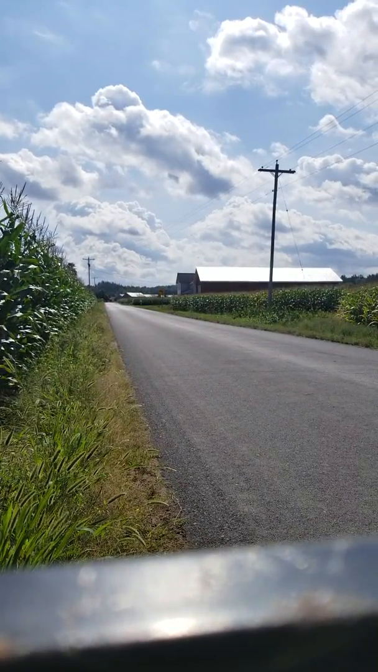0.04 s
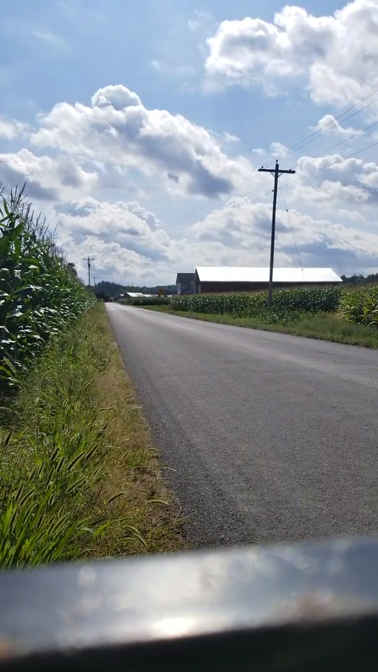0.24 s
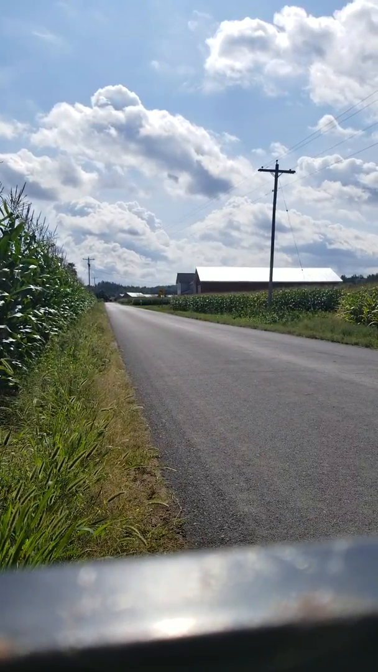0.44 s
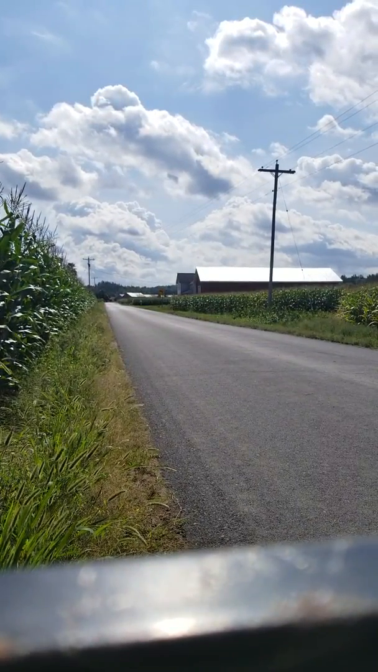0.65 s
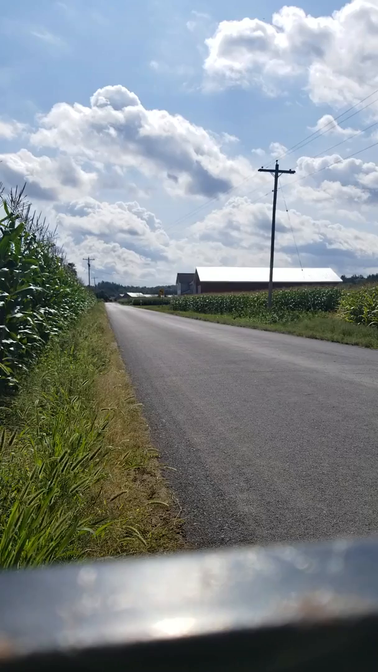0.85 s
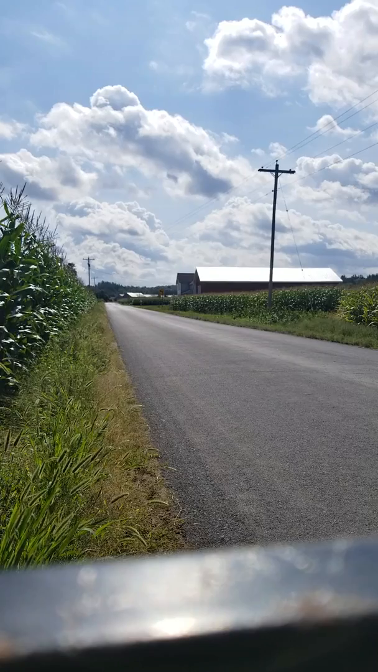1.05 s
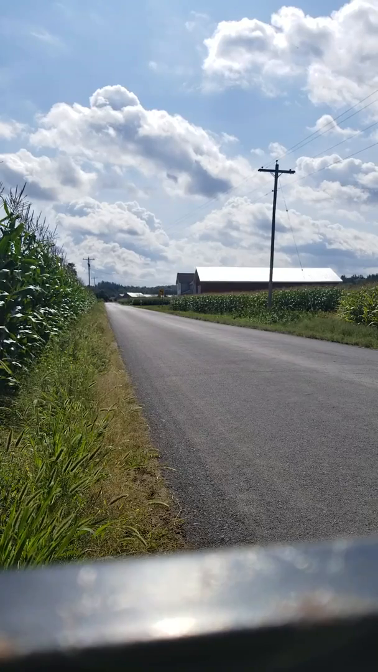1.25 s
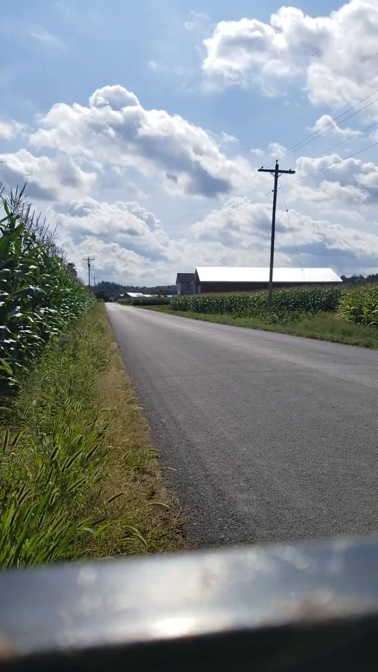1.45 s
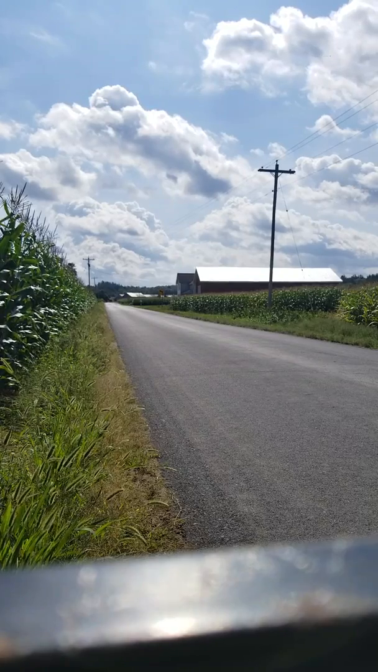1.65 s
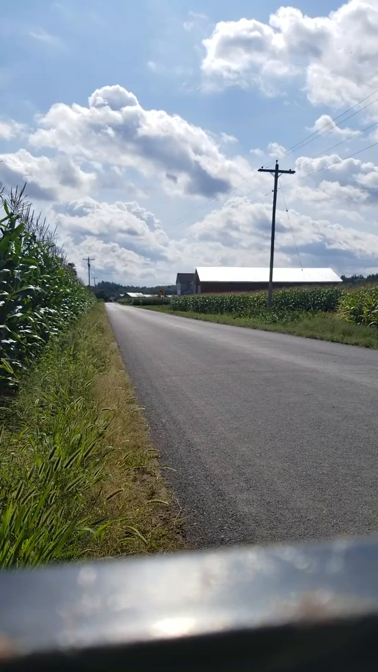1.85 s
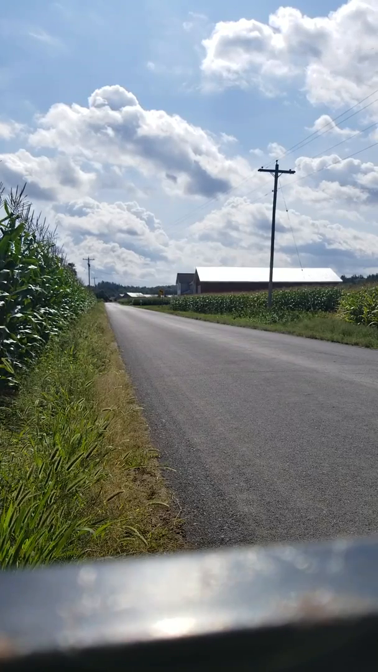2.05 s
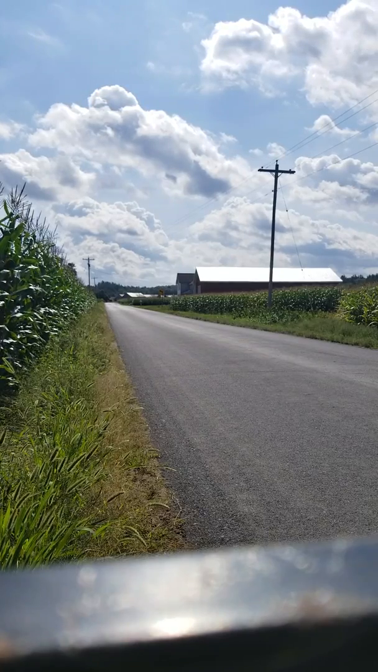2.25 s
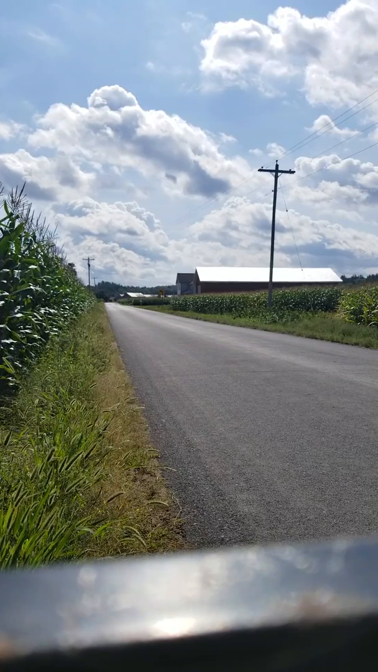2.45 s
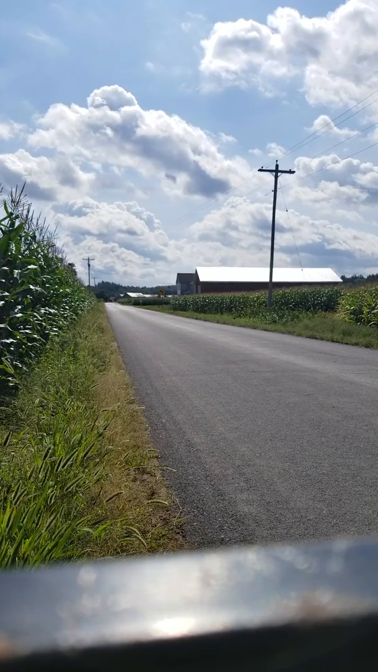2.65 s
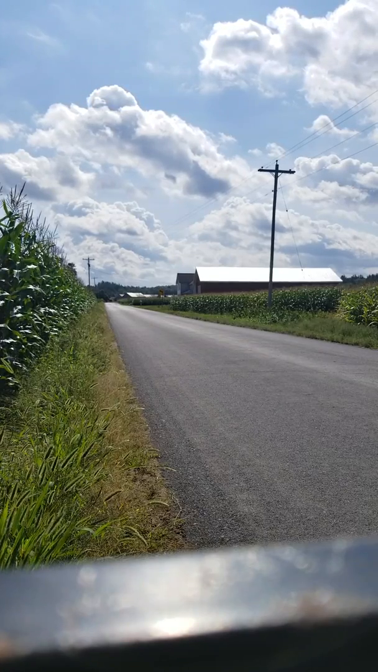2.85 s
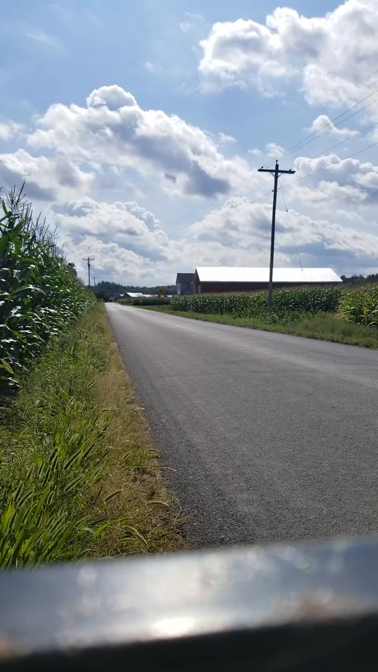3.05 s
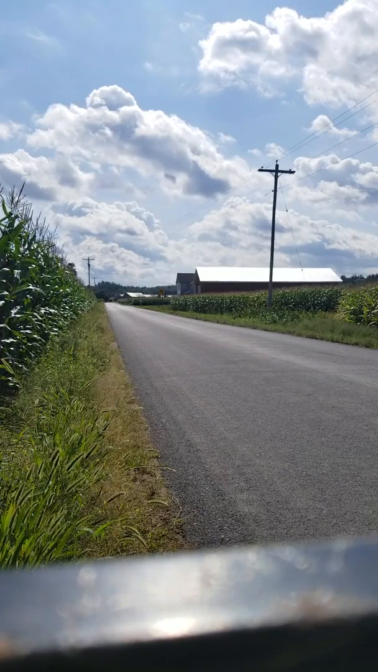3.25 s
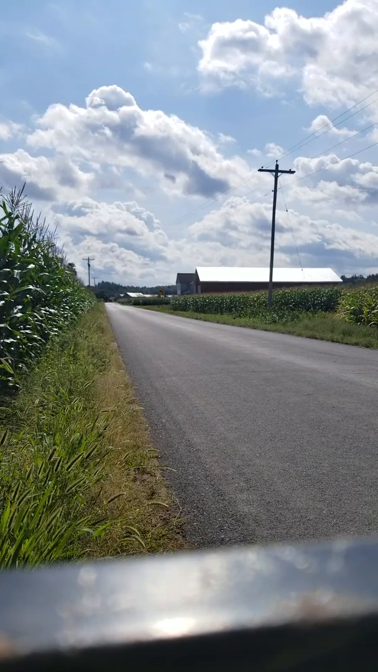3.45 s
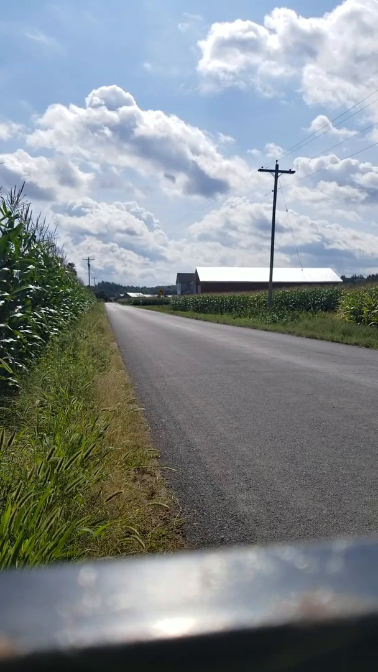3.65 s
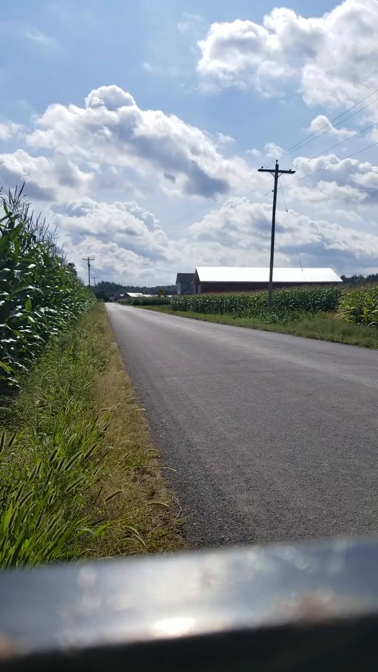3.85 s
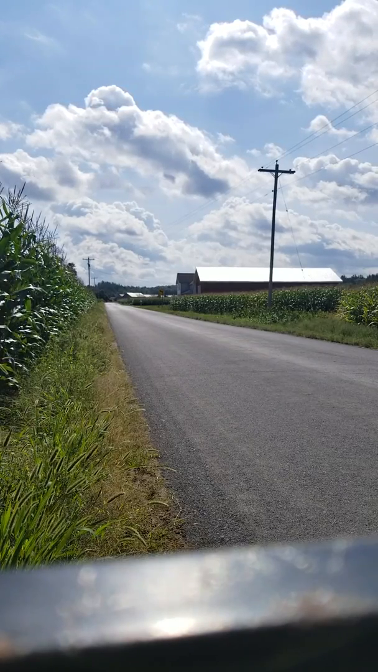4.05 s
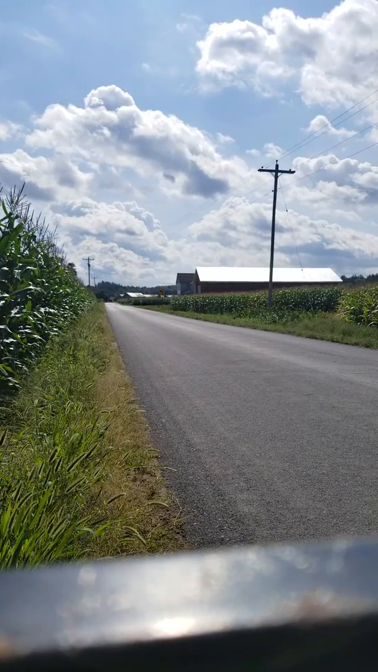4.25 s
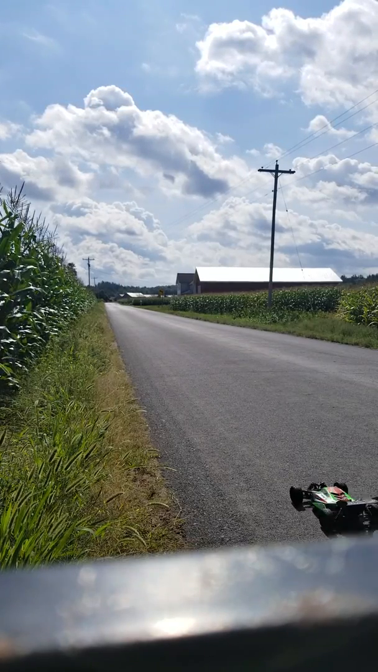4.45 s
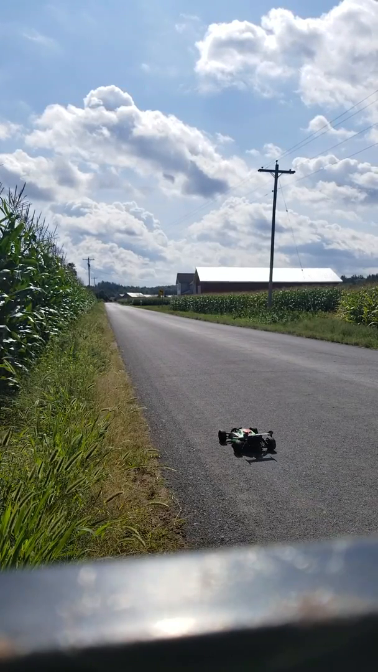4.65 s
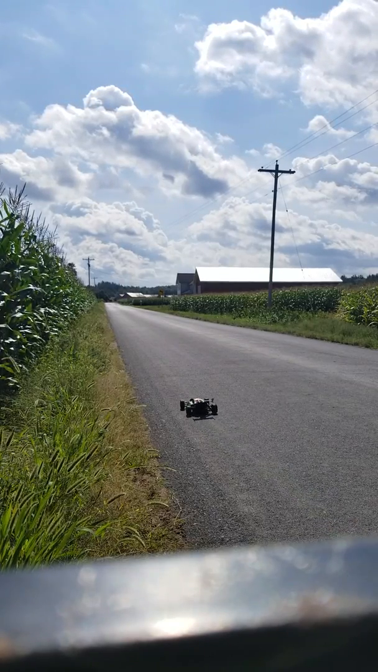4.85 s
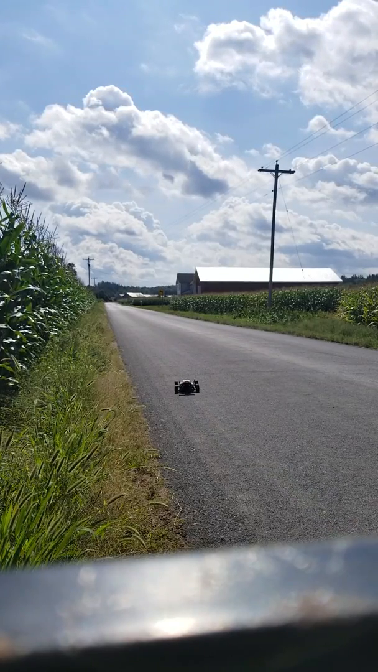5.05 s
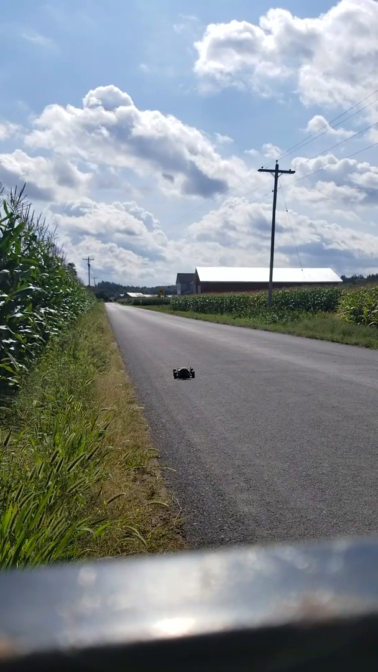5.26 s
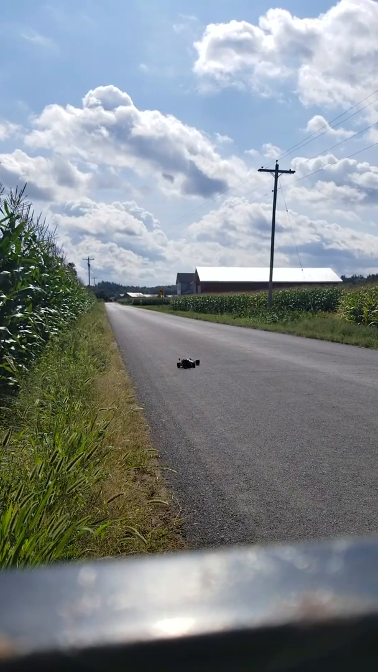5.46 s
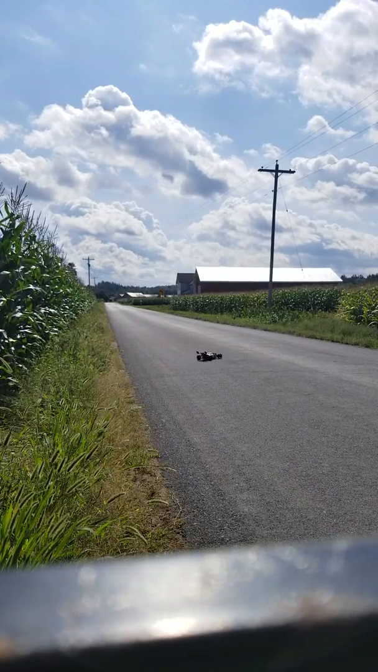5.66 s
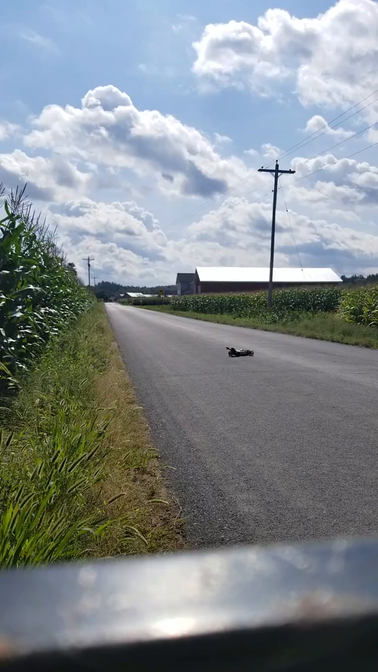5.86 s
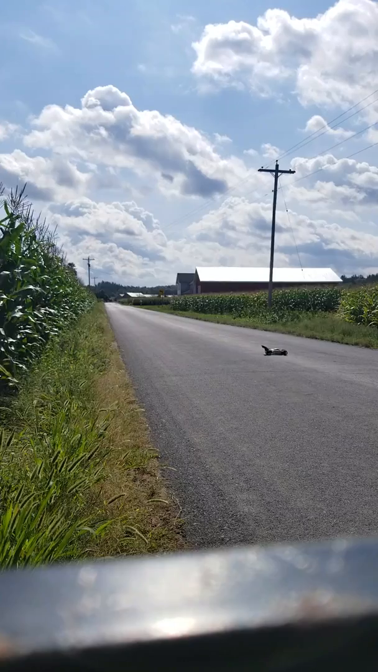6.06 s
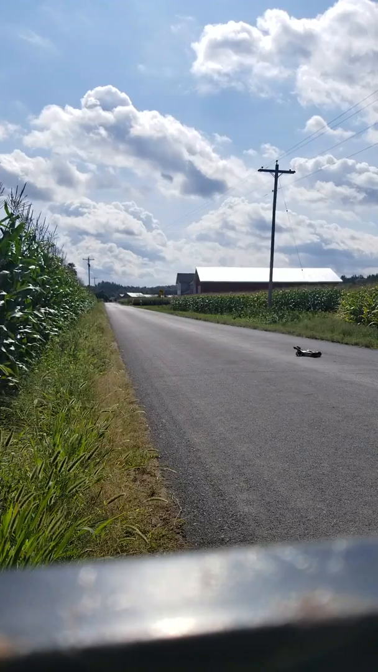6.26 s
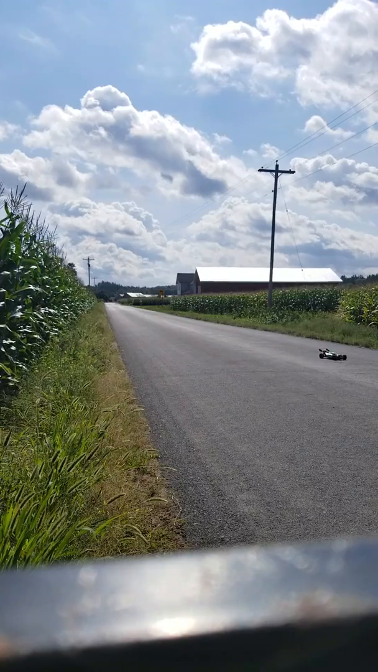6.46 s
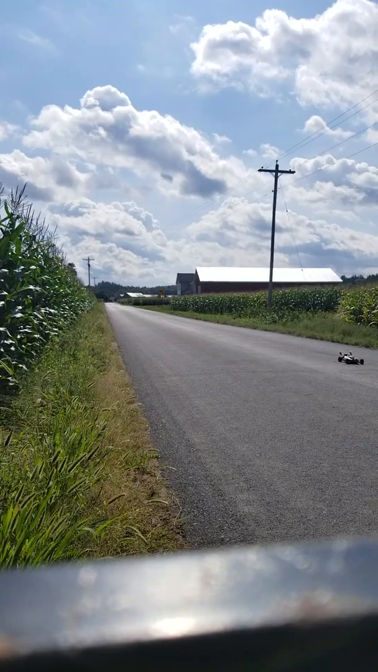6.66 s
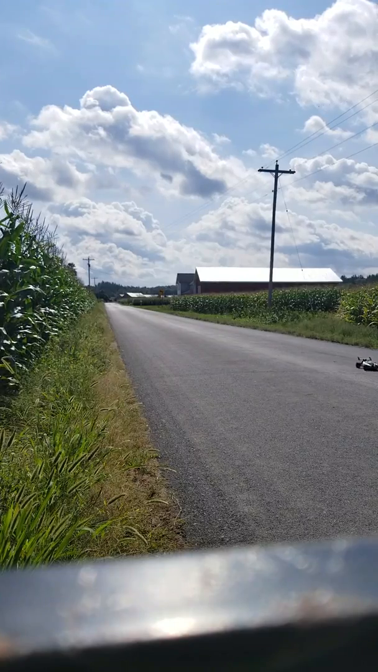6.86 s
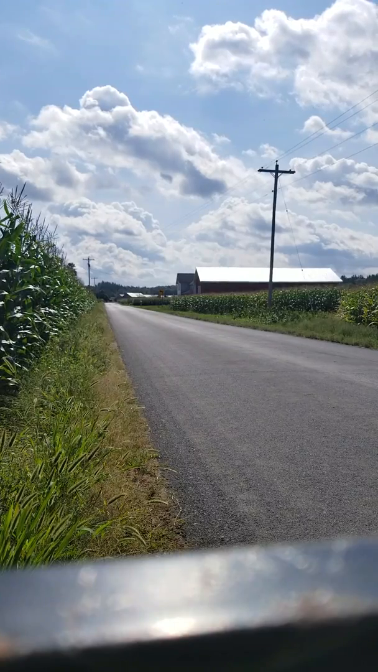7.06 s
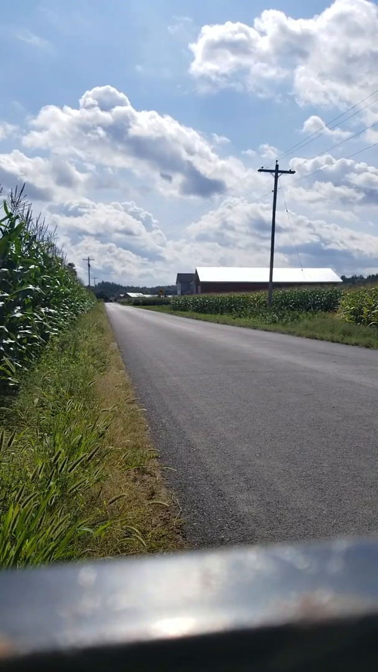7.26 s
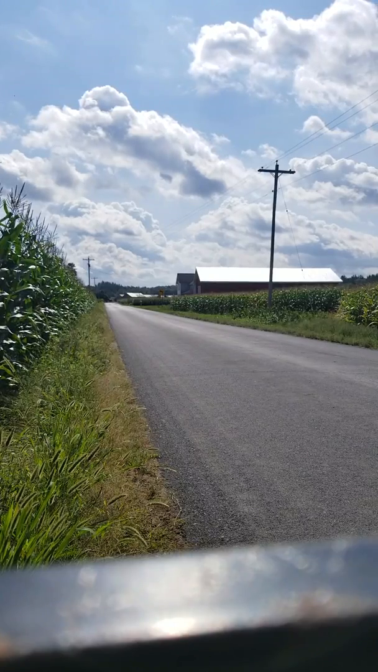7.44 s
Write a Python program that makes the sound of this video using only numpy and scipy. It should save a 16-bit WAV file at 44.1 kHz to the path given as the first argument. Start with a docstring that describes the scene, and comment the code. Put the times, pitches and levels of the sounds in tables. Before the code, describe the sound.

Small clicks and handling thuds sound right on the microphone against a quiet field with faint insects. Then a remote-control car jerks into motion nearby, gears rattling, and speeds off along the road, its electric motor whining upward over rough tyre hiss. The throttle is released and the whine sinks as the car moves away, before it rises once more on the return.

```python
"""First come small clicks and bumps on a camera, while insects rasp in a field over a low rumble.
Then a radio-controlled car stutters into motion beside the camera on a country road, races off,
coasts, turns and speeds back. Its gears whine at multiples of the axle speed, louder when the motor
works hard, over the gritty noise of tyres and drivetrain. A puff of wind passes while it coasts."""
import sys
import numpy as np
from scipy import signal
from scipy.fft import rfft, irfft, next_fast_len
from scipy.io import wavfile
from scipy.ndimage import uniform_filter1d, map_coordinates

SR = 44100
rng = np.random.default_rng(int(sys.argv[2]) if len(sys.argv) > 2 else 0)


def int16_out(signal):
    """Quantize to a 16-bit WAV file."""
    q = np.round(np.clip(np.atleast_2d(signal).T, -1, 1) * 32767)
    wavfile.write(sys.argv[1], SR, q.astype(np.int16))


N = 330794
T = np.arange(N) / SR


def amp(db):
    """Turn decibels into a gain."""
    return np.exp(np.asarray(db) * (np.log(10) / 20))


def unit(x):
    """Scale x to an average strength (rms) of 1."""
    return x / np.sqrt(np.mean(x ** 2) + 1e-20)


def along(points, hz):
    """Read a (frequency, value) table at hz, on a log axis."""
    freqs, values = np.transpose(sorted(points))
    return np.interp(np.log(hz + 1), np.log(freqs + 1), values)


def curve(points):
    """Read a (time, value) table at every sample."""
    return np.interp(T, *np.transpose(points))


def ramp(start_s, length_s):
    """A straight rise from 0 to 1."""
    return np.clip((T - start_s) / length_s, 0, 1)


def swell(peak_s, width_s):
    """A bell-shaped rise to 1 and back."""
    return np.exp(-((T - peak_s) / width_s) ** 2 / 2)


def wobble(rate, t=T):
    """A smooth random curve with `rate` new values a second."""
    knots = rng.standard_normal(next_fast_len(int(N * rate / SR) + 4))
    fine = signal.resample(knots, 10 * len(knots))
    return unit(np.interp(t * (rate * 10), np.arange(len(fine)), fine))


def filtered(x, response):
    """Scale each frequency of x by response(hz)."""
    size = next_fast_len(N + 8192)
    return irfft(rfft(x, size) * response(np.fft.rfftfreq(size, 1 / SR)), size)[..., :N]


def white():
    """Two unrelated white noises."""
    return rng.standard_normal((2, N))


def narrow(centre_hz, width_hz):
    """Noise in one narrow band."""
    return unit(filtered(white(), lambda hz: 1 / (1 + ((hz - centre_hz) / width_hz) ** 4)))


def ring(x, hz, q):
    """Make x ring at one pitch; a higher q rings longer."""
    return signal.lfilter(*signal.iirpeak(min(hz, SR / 3), max(q, .6), SR), x)


def add(track, start_s, sound):
    """Mix a sound into the track."""
    part = track[..., round(start_s * SR):][..., :sound.shape[-1]]
    part += sound[..., :part.shape[-1]]


# how alike left and right sound: (frequency [Hz], likeness [0-1])
STEREO_LIKENESS = [(25, 1), (60, 0.96), (130, 0.9), (400, 0.63), (800, 0.18), (1400, 0.16), (3000, 0.31),
                   (15000, 0.14)]
def colour(pair, spectrum, alike=STEREO_LIKENESS):
    """Give two noises a tone colour and blend them into left and right, at rms 1."""
    def shape(hz):
        angle = np.arccos(np.clip(along(alike, hz), -1, 1)) / 2
        return amp(along(spectrum, hz)) * [np.cos(angle), np.sin(angle)]
    mid, side = filtered(pair, shape)
    return unit(np.array([mid + side, mid - side]))


# tone colours of the rumble and the air: (frequency [Hz], relative level [dB])
RUMBLE_COLOUR = [(18, -34), (30, -8), (45, 4), (60, -8.5), (76, 4.5), (100, -2), (126, -6.5), (175, -28),
                 (260, -70)]
AIR_COLOUR = [(76, -12), (130, -10.5), (241, -20.5), (424, -18), (697, -27.5), (759, -30), (1360, -30.5),
              (1430, -28), (1850, -33.5), (7280, -35.5), (7800, -55), (10100, -37), (15800, -37.5),
              (17200, -120)]
def field(rumble_db=-59.3, air_db=-68, hum_db=-83, hum_hz=1472):
    """A low rumble, soft air and a thin steady hum."""
    rumble = amp(rumble_db + 0.4 * wobble(7)) * colour(white(), RUMBLE_COLOUR)
    air = amp(air_db + 0.1 * wobble(5.2)) * colour(white(), AIR_COLOUR)
    hum = amp(hum_db) * unit(np.sin(2 * np.pi * hum_hz * T + .5 * wobble(30)))
    return rumble + air + hum


def gust(level_db=-52.5, lumpy_db=3):
    """A puff of wind buffets each of the two microphone openings in its own way."""
    strength = swell(peak_s=5.26, width_s=0.19) * amp(level_db + lumpy_db * wobble(18))
    return strength * colour(white(), RUMBLE_COLOUR, alike=[(60, .05)])


def far_insects(level_db=-78, swell_db=2):
    """A distant chorus swells and fades."""
    return amp(level_db + swell_db * wobble(5.57)) * narrow(centre_hz=5900, width_hz=850)


# one row per insect: (pitch [Hz], wing strokes [per s], level [dB])
INSECT_CALLS = [(9400, 17.2, -69), (8810, 17.6, -68), (8280, 28, -74.5)]
def insects(pulse_db=6, width_hz=270):
    """Each insect rasps in quick, nearly even wing strokes."""
    chorus = np.zeros((2, N))
    for hz, rate, db in INSECT_CALLS:
        stroke = np.sin(2 * np.pi * rate * T + 0.87 * wobble(2.87))
        chorus += amp(db) * unit(amp(pulse_db * stroke)) * narrow(hz, width_hz)
    return chorus


# the pitches in one small squeak: (pitch [Hz], level [dB])
SQUEAK_PITCHES = [(1970, -76), (2950, -71), (5600, -78), (6880, -71)]
def squeak():
    """Something rubs briefly near the camera."""
    rasp = sum(amp(db) * narrow(hz, width_hz=120) for hz, db in SQUEAK_PITCHES)
    return swell(peak_s=2.293, width_s=0.019) * rasp


# soft bumps on the camera: (time [s], peak level [dB], pitch [Hz])
SOFT_BUMPS = [(1.157, -42, 263), (1.199, -24, 458), (1.266, -32.5, 434), (1.297, -38, 486),
              (1.367, -35.5, 680), (1.428, -39.5, 380), (1.61, -48, 438), (2.332, -43.5, 300),
              (2.382, -43, 300)]
def bumps(push_s=0.0028, scrape_fade_s=0.1, cutoff_hz=800):
    """A short push and a scrape make the camera's case thud."""
    track, t = np.zeros((2, N)), T[:SR // 5]
    muffle = signal.butter(4, cutoff_hz, fs=SR, output="sos")
    for s, db, hz in SOFT_BUMPS:
        scrape = 0.38 * rng.standard_normal(len(t)) * amp(-60 * t / scrape_fade_s)
        thud = signal.sosfilt(muffle, ring(np.exp(-t / push_s) + scrape, hz, q=6.1))
        add(track, s, amp(db) * thud / np.abs(thud).max())
    return track


# tone colour of rubbing on the case: (frequency [Hz], relative level [dB])
RUSTLE_COLOUR = [(60, -31), (160, 3), (450, 1), (750, -15), (1200, -23.5), (6000, -27.5), (15000, -44)]
def rustle(level_db=-65, early_s=0.0083):
    """Soft rubbing on the case around each bump."""
    contact = sum(swell(s - early_s, width_s=0.066) for s, _, _ in SOFT_BUMPS)
    return amp(level_db) * np.sqrt(contact) * colour(white(), RUSTLE_COLOUR)


# hard knocks on the camera: (time [s], level [dB])
HARD_KNOCKS = [(1.368, -44), (1.644, -50.5), (1.741, -37), (2.684, -57)]
# tone colour of its case: (frequency [Hz], relative level [dB])
CASE_COLOUR = [(120, -46), (200, -20), (303, -2), (581, -17), (804, -3.5), (1290, -7.5), (1430, -13),
               (2250, -9.5), (2950, -31), (3410, -23), (5970, -19), (7420, -32), (15000, -37)]
def knocks(fade_s=0.051, tail_db=-28, tail_fade_s=0.43):
    """Hard contacts briefly rattle the camera's case."""
    envelope, t = np.zeros(N), T[:SR // 4]
    decay = amp(-60 * t / fade_s) + amp(tail_db - 60 * t / tail_fade_s)
    for s, db in HARD_KNOCKS:
        add(envelope, s, amp(db) * decay)
    return envelope * colour(white(), CASE_COLOUR)


# clicks: (time [s], relative level [dB], pitch [Hz], time to fade 60 dB [s], pitch sharpness [Q])
SHARP_CLICKS = [(.076, -18, 3860, 0.0082, 0.95), (.077, -25, 10000, .005, 1.5),
                (.382, -38, 2660, 0.01, 2.9), (0.496, -21, 2600, 0.011, 2.6),
                (1.199, -41, 7800, 0.085, 0.45), (3.094, -34, 5900, 0.029, .6),
                (3.331, -21, 5400, 0.0098, .7), (3.586, -33, 11000, 0.0064, .7),
                (3.62, -30, 11100, .008, .7)]
def clicks(tail_db=-42, tail_fade_s=.25):
    """Small sharp clicks: first on the camera, then ticks of gears and grit as the car starts."""
    track, t = np.zeros((2, N)), T[:SR // 5]
    for s, db, hz, fade_s, q in SHARP_CLICKS:
        decay = amp(-60 * t / fade_s) + amp(tail_db - 60 * t / tail_fade_s)
        crack = ring(rng.standard_normal((2, len(t))) * decay, hz, q=1.9)
        tick = ring(ring(crack, hz, q), hz, q)
        energy = fade_s * SR / np.log(1e6)  # a longer click carries more
        add(track, s, amp(db - 4.5) * np.sqrt(energy) * tick / np.linalg.norm(tick))
    return track


# the motor catches in jerks at the start; the gears clack once when the throttle is released:
# (time [s], relative level [dB], rebound compared with the jerk [dB])
DRIVETRAIN_JERKS = [(2.969, -35, 10.5), (3.092, -29, 2.5), (3.129, -20.5, -13), (3.155, -22.5, -4),
                    (3.185, -21, -4), (3.235, -18.5, -12), (3.272, -19.5, -2.5), (3.3, -20, -13),
                    (3.328, -22.5, 0), (3.372, -21.5, -2), (3.414, -23, -4), (3.453, -21.5, -4.5),
                    (3.492, -20.5, -6.5), (4.815, -33, -13)]
# tone colour of loose gears: (frequency [Hz], relative level [dB])
CHATTER_COLOUR = [(71, -40), (120, -17), (277, -8), (361, -3), (666, -13.5), (768, -6), (1310, -1.5),
                  (1670, -10), (2310, -13.5), (3270, -1), (4170, -8), (6670, -7), (8180, -21), (11100, -10),
                  (15700, -19.5)]
def jerks(level_db=-8, spiky_db=1.8, attack_s=.0005, fade_s=0.072, rebound_s=0.01296):
    """Each jerk of the drivetrain shakes loose gears, which rebound once."""
    power, t = np.zeros(N), T[:SR // 3]
    tail = amp(-24 - 60 * t / 0.43)
    shake = (amp(-60 * t / fade_s) + tail) * (1 - np.exp(-t / attack_s))
    for s, db, rebound_db in DRIVETRAIN_JERKS:
        add(power, s, (amp(db) * shake) ** 2)
        add(power, s + rebound_s, (amp(db + rebound_db) * shake) ** 2)
    chatter = colour(white() * amp(spiky_db * wobble(1000)), CHATTER_COLOUR)
    return amp(level_db) * np.sqrt(power) * chatter


# launch, coast through the turn, second pull: (time [s], axle speed [turns per s])
AXLE_SPEED = [(3.52, 4.5), (3.6, 10.5), (3.8, 29.3), (3.9, 40.1), (4.0, 48.6), (4.2, 60), (4.5, 70.4),
              (4.78, 76.5), (5.0, 70.4), (5.4, 64), (5.6, 57.5), (5.75, 46.3), (6.0, 42.2), (6.45, 32.2),
              (6.6, 40), (6.8, 53.6), (7.2, 80), (7.5, 87.5)]
# the car passes, drives off and comes back: (time [s], distance [m])
CAR_DISTANCE = [(3.52, 5.5), (3.82, 1.8), (4.02, 2.08), (4.15, 1.07), (4.5, 2.46), (5, 6.14), (5.5, 10.1),
                (6.7, 12.7), (7.15, 5.4), (7.5, 5)]
def driving(coast_s=4.76, pull_s=6.48, switch_s=0.041, base_speed=60, base_load=60, base_m=1.5):
    """Axle speed, throttle, and gain(rule), which turns a loudness rule into a gain over time."""
    speed, distance = curve(AXLE_SPEED), curve(CAR_DISTANCE)
    throttle = 1 - ramp(coast_s, switch_s) + ramp(pull_s, switch_s)
    acceleration = uniform_filter1d(np.gradient(speed) * SR, size=6000)
    friction = 24  # load at steady speed, in the units of acceleration (turns per s each second)
    jolt = 110 * swell(peak_s=6.535, width_s=.025)  # the gears take up the second pull
    load = np.hypot(acceleration, friction) + jolt
    slack_db = -12 * swell(peak_s=4.795, width_s=0.0096)  # the gears run free for a moment
    doublings = np.log2([speed / base_speed, load / base_load, distance / base_m])
    state = np.array([np.ones(N), *doublings, 1 - throttle])
    return speed, throttle, lambda rule: amp(np.dot(rule, state) + slack_db)


def tread(turns, size=4096, harmonics=170):
    """Roughness of tyres and gears that comes round again with every turn."""
    ripples = np.exp(2j * np.pi * rng.random((2, harmonics))) * (np.arange(harmonics) > 0)
    pattern = unit(irfft(ripples, size))
    return np.array([np.interp(turns % 1, np.arange(size) / size, side) for side in pattern])


def streaks(x, speed, depth_db=2.7, bands_per_multiple=.5, changes_per_s=13):
    """Bands of gear noise swell and fade at random while they glide with the axle speed."""
    hz, t, spectrum = signal.stft(x, SR, nperseg=1024)
    band = np.outer(hz, 1 / np.maximum(np.interp(t, T, speed), 20)) * bands_per_multiple
    moment = np.broadcast_to(t * changes_per_s, band.shape)
    swells = map_coordinates(rng.standard_normal((800, 80)), [band, moment], mode="wrap")
    return signal.istft(spectrum * amp(depth_db * swells), SR, nperseg=1024)[1][:, :N]


# tone colours of rolling, under power and coasting: (frequency [Hz], relative level [dB])
PULLING_COLOUR = [(88, -51), (150, -29), (360, -17.5), (501, -21.5), (575, -6.5), (740, -3), (816, -7),
                  (972, -3), (2160, -7), (3580, 0), (4610, -5.5), (6420, -6), (7800, -24), (10900, -15),
                  (15700, -30)]
COASTING_COLOUR = [(120, -46), (200, -22), (322, -13), (472, -16), (598, 5.5), (846, -1), (1660, 7),
                   (2120, -1.5), (2820, 2.5), (4000, 2.5), (5350, -2.5), (6310, 0.5), (7850, -21.5),
                   (10500, -15), (15700, -22)]
# peaks and dips heard as the car coasts away: (frequency [Hz], width [Hz], gain [dB])
COASTING_PEAKS = [(2110, 100, -4), (3380, 55, 4.5), (3470, 100, -5.5), (4000, 190, 0), (5400, 140, -6),
                  (6070, 670, 2.5), (9400, 180, 3), (13000, 400, 3)]
# how alike the car sounds left and right: (frequency [Hz], likeness [0-1])
CAR_LIKENESS = [(300, 0.95), (700, 0.8), (1200, 0.6), (2300, 0.53), (5000, 0.02), (12000, 0.6)]
# loudness rules for four bands, low to high: (base level [dB], change when speed doubles [dB],
# when load doubles [dB], when distance doubles [dB], when coasting [dB])
DRUM_RULE = (-50.5, 1, .2, -6.7, -1.5)
ROAR_RULE = (-36, 1, -0.42, -6, -4)
RATTLE_RULE = (-34, 5.5, 0.83, -3.5, -2.5)
HISS_RULE = (-38.5, 6.5, -1.66, -4, -4.5)
def rolling(speed, turns, throttle, gain, grit_db=1.0, waver_db=0.8, clatter_db=1.24, per_turn_db=1):
    """Gritty noise of tyres and drivetrain; its colour changes with the throttle."""
    def peaks(hz):
        return amp(sum(db / (1 + ((hz - centre) / width) ** 2) for centre, width, db in COASTING_PEAKS))
    contact = white() + .5 * tread(turns + .002 * wobble(60))
    contact = streaks(contact * amp(grit_db * wobble(500)), speed)
    pulling = colour(contact, PULLING_COLOUR, CAR_LIKENESS)
    coasting = colour(filtered(contact, peaks), COASTING_COLOUR, CAR_LIKENESS)
    noise = np.sqrt(throttle) * pulling + np.sqrt(1 - throttle) * coasting
    low = filtered(noise, lambda hz: 1 / (1 + (hz / 2000) ** 6))
    drum = filtered(noise, lambda hz: 1 / (1 + (hz / 440) ** 16))
    hiss = filtered(noise, lambda hz: 1 - 1 / (1 + (hz / 7700) ** 16))
    # unloaded gears clatter, partly in step with the axle
    clatter = amp((1 - throttle) * (clatter_db * wobble(160) + per_turn_db * np.sin(2 * np.pi * turns)))
    roar, rattle = low - drum, clatter * (noise - low - hiss)
    sound = np.zeros((2, N))
    for band, rule in [(drum, DRUM_RULE), (roar, ROAR_RULE), (rattle, RATTLE_RULE), (hiss, HISS_RULE)]:
        power = uniform_filter1d(np.mean(band ** 2, axis=0), size=8192)
        steady = band / np.sqrt(np.abs(power) + 1e-12)
        sound += steady * gain(rule) * amp(waver_db * wobble(30))
    return sound


# how strongly the car's frame rings: (frequency [Hz], gain [dB])
FRAME_RESPONSE = [(150, -24.5), (520, -27), (650, -5), (780, 3), (890, -3), (1030, 5.5), (1300, -1.5),
                  (1650, 1.5), (2050, -21), (2600, 0.5), (2850, 8), (3200, 3), (3750, 5), (4150, -21),
                  (5000, -10)]
def whine(gear_tones, speed, turns, rough, flicker_db, step=24):
    """Gear tones, each swelling as it glides through a pitch at which the frame rings."""
    t, tones = T[::step], np.zeros(N)
    for multiple, db in gear_tones:
        frame_db = along(FRAME_RESPONSE, multiple * speed[::step])
        level = amp(db + frame_db) * unit(amp(flicker_db * wobble(35, t)))
        phase = 2 * np.pi * multiple * turns + rough * wobble(130)  # loose teeth shake the phase
        tones += np.interp(T, t, level) * np.sin(phase)
    return tones


# tones of the motor, the meshing teeth, the high whine under power and the coasting gears:
# (pitch [multiple of the axle speed], relative level [dB])
MOTOR_TONES = [(6, -12.5), (11, -5.5), (13, -1), (15, -15.5), (17, -19)]
TEETH_TONES = [(24, 0.5), (26, 3.5), (27, 1.5), (28, -0.5), (29, -1.5), (30, 11.5), (31, -1), (33, -8)]
HIGH_TONES = [(37, -9), (39, 0), (43, -7), (44, 5.5), (45, -2.5), (52, 7)]
COAST_TONES = [(28, 6), (39, 13.5), (52, -10), (60, -12), (78, -8), (91, -3)]
# their loudness rules: (base level [dB], change when speed doubles [dB],
# when load doubles [dB], when distance doubles [dB], when coasting [dB])
MOTOR_RULE = (-29.5, -7, 7.5, -6.8, -16)
TEETH_RULE = (-50, -1, 3.5, -3, -8)
HIGH_RULE = (-62, 23.5, 6.5, 1.5, -20)
COAST_RULE = (-92, 10.5, 5.5, -2, 33)
# how much later the car is heard on the right: (time [s], delay [ms])
RIGHT_DELAY = [(3.6, 0.008), (4.25, 0.072), (4.7, 0.12), (5, 0.22), (5.9, 0.19), (6.3, 0.21), (7.5, 0.14)]
def car():
    """Axle speed sets the gears' pitches; the car's direction delays its sound on the right."""
    speed, throttle, gain = driving()
    turns = np.cumsum(speed * (1 + 0.00194 * wobble(25))) / SR
    sound = rolling(speed, turns, throttle, gain)
    sound += gain(MOTOR_RULE) * whine(MOTOR_TONES, speed, turns, rough=.36, flicker_db=2.2)
    sound += gain(TEETH_RULE) * whine(TEETH_TONES, speed, turns, rough=.78, flicker_db=2.6)
    sound += gain(HIGH_RULE) * whine(HIGH_TONES, speed, turns, rough=1.0, flicker_db=-1.0)
    # off the throttle the wheels drive the motor and other teeth sing
    sound += gain(COAST_RULE) * whine(COAST_TONES, speed, turns, rough=0.16, flicker_db=4.5)
    left, right = sound * ramp(start_s=3.037, length_s=0.34)  # the wheels begin to turn
    delayed_s = T - curve(RIGHT_DELAY) / 1000
    return np.array([left, map_coordinates(right, [delayed_s * SR], mode="nearest")])


def scene():
    """The car, the small nearby noises and the field, added together."""
    nearby = bumps() + clicks() + knocks() + rustle() + squeak()
    return car() + jerks() + nearby + insects() + far_insects() + field() + gust()


# how the two microphone openings colour the sound: (frequency [Hz], left minus right [dB])
MIC_BALANCE = [(60, 2.5), (120, -1), (200, 1.5), (380, -9.5), (700, 1), (1290, 6), (2380, 7), (3500, 9),
               (5000, 1.5), (6500, -9), (8500, 19), (11000, 6.5), (15000, 14.5)]
def record(dry, top_hz=15870):
    """Each microphone opening colours its own side; the highest treble is cut off."""
    def openings(hz):
        gains = amp(np.outer([.5, -.5], along(MIC_BALANCE, hz)))
        return gains / np.sqrt(np.mean(gains ** 2, axis=0)) * (hz < top_hz)
    return filtered(dry, openings)


dry = scene()
out = record(dry)
int16_out(out)
```